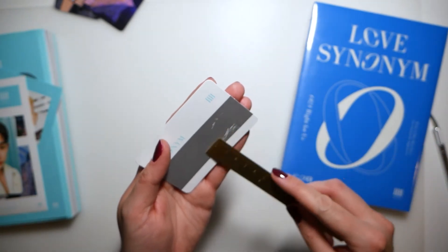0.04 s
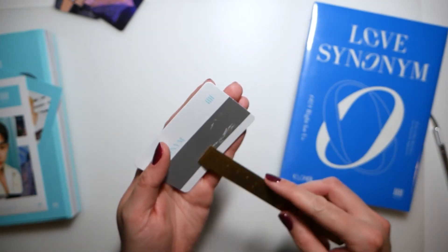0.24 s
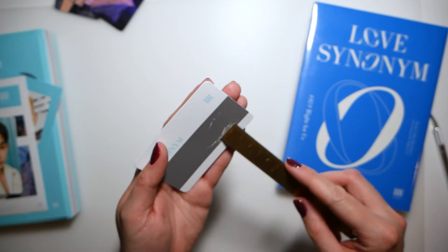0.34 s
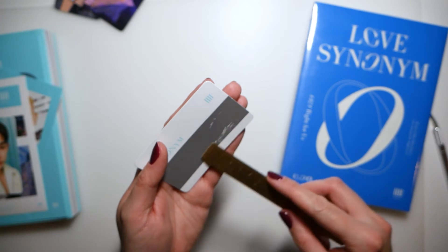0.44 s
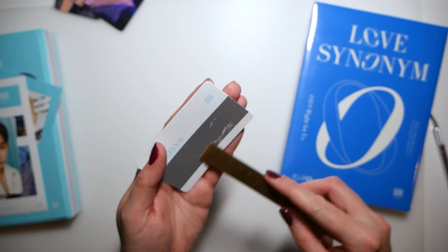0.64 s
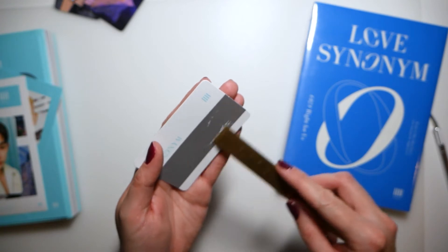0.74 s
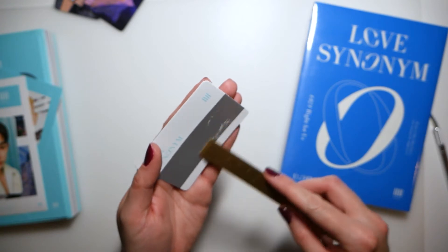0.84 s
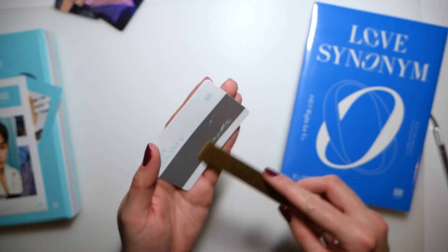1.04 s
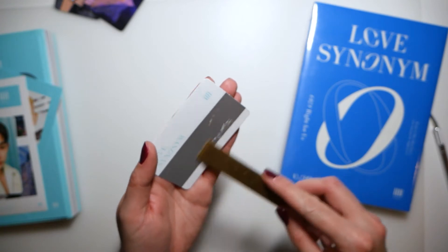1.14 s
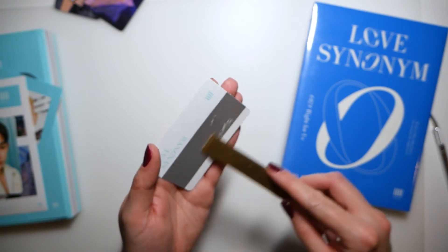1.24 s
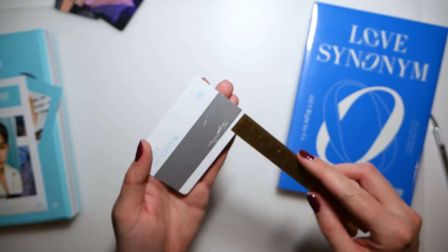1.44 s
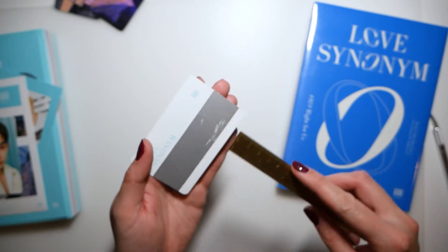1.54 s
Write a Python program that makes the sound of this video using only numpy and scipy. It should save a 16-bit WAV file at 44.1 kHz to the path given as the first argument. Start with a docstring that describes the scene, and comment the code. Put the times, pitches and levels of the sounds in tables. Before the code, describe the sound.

Quick scratching of a metal ruler on a coated card, close up in a small quiet room. Two light strokes lead into a firmer run with a thin metallic ring and tiny catches, ending on a softer stroke.

```python
"""A metal ruler's edge scrapes the coating off a hand-held card, about ten strokes a second.
Each stroke is a dense stream of tiny slips that hiss in the coating and ring the ruler and the card;
now and then the edge snags. The card is close to the microphone, dead centre, in a small dry room.
Under it lie a low room rumble and a faint electrical whine."""
import sys
import numpy as np
from scipy import signal
from scipy.fft import rfft, irfft, next_fast_len
from scipy.io import wavfile
from scipy.ndimage import map_coordinates

SR = 44100
rng = np.random.default_rng(int(sys.argv[2]) if len(sys.argv) > 2 else 0)


def to_wav(s):
    """Save 16-bit WAV."""
    ch = np.atleast_2d(s).T  # columns
    pcm = np.round(np.clip(ch, -1, 1) * 32767)  # PCM
    wavfile.write(sys.argv[1], SR, pcm.astype(np.int16))


N = 70560


def amp(db):
    """Decibels to gain."""
    return 10 ** (np.asarray(db) / 20)


def unit(x):
    """Scale to rms 1."""
    return x / np.sqrt(np.mean(x ** 2) + 1e-20)


def along(points, hz):
    """Read a curve of (freq_hz, value) points on a log frequency axis."""
    freqs, values = np.transpose(points)
    return np.interp(np.log(hz + 1), np.log(freqs + 1), values)


def filtered(x, response):
    """Pass x through a frequency response."""
    size = next_fast_len(N + SR // 2)
    return irfft(rfft(x, size) * response(np.fft.rfftfreq(size, 1 / SR)), size)[..., :N]


def colour(points):
    """A smooth response that keeps the power of white noise."""
    return lambda hz: unit(amp(along(points, hz)))


def band(hz, low_hz, high_hz, order):
    """A steep band-pass gain."""
    return 1 / np.sqrt((1 + (low_hz / (hz + 1)) ** (2 * order)) * (1 + (hz / high_hz) ** (2 * order)))


def ringing(modes, low_hz, high_hz):
    """Damped modes of alternating sign, confined to a band, keeping the power of white noise."""
    def response(hz):
        gain = sum((-1) ** k * amp(db) * 1j * hz * width / (pitch ** 2 - hz ** 2 + 1j * hz * width)
                   for k, (pitch, width, db) in enumerate(modes))
        gain *= band(hz, low_hz, high_hz, order=30)
        return gain / np.sqrt(np.mean(abs(gain) ** 2))
    return response


def stroke_levels(rise_curve=1.42, fall_curve=0.81):
    """Each stroke swells, holds and fades: one gain curve for each layer."""
    # strokes of the edge: start_s, rise_s, hold_s, fall_s, then the layers:
    # rasp_db, ring_db, upper_ring_db, fizz_db, flex_db, body_db
    strokes = [ (0.000, 0.025, 0.062, .026, -48, -44, -57, -63.5, -58.5, -65),
               (0.112, 0.024, 0.026, 0.036, -44, -42.5, -48, -57.5, -50.5, -70),
               (0.207, 0.046, 0.041, 0.024, -31, -32.5, -32, -42, -44.5, -62),
               (0.31, 0.02, 0.029, 0.047, -35.5, -36, -37.5, -44.5, -47.5, -58),
               (0.422, .056, 0.028, 0.023, -36.5, -37, -39.5, -46, -51, -62),
               (0.526, 0.028, 0.041, 0.039, -35, -36.5, -36.5, -43.5, -48, -53.5),
               (0.634, 0.0062, 0.057, .010, -45, -46, -49, -52, -56.5, -59),
               (0.695, 0.0039, 0.017, 0.019, -33, -39, -38, -49, -52, -59),
               (0.731, 0.032, 0.034, 0.044, -34, -36, -32.5, -44.5, -48, -56),
               (0.837, 0.047, 0.036, 0.043, -36, -38.5, -37, -45, -53, -56),
               (0.948, 0.019, .044, 0.028, -36, -38.5, -32.5, -43.5, -52, -54),
               (1.046, 0.048, 0.034, 0.029, -32.5, -38, -34, -44.5, -52.5, -56),
               (1.152, 0.028, 0.047, 0.043, -32.5, -37.5, -39, -44, -38, -62.5),
               (1.256, 0.019, 0.058, 0.028, -33.5, -42, -35.5, -40.5, -40, -69.5),
               (1.352, 0.02, .004, 0.036, -46.5, -42, -48.5, -52, -44, -55)]
    # swell of each layer, in that order: depth_db
    swell_db = [24.46, 26.95, 27.1, 28.3, 23.2, 20.92]
    t, power = np.arange(N) / SR, 0
    for start, rise, hold, fall, *levels_db in strokes:
        before = np.maximum((start + rise - t) / rise, 0)
        after = np.maximum((t - start - rise - hold) / fall, 0)
        slack = before ** rise_curve + after ** fall_curve
        power += amp(np.array(levels_db)[:, None] - np.outer(swell_db, slack)) ** 2
    return np.sqrt(power)


def chatter(depth_db, knots_per_s):
    """The edge grips unevenly: a smooth random gain."""
    knots = rng.standard_normal(N // 8)
    wobble = map_coordinates(knots, [np.arange(N) * knots_per_s / SR], mode="wrap")
    return unit(amp(depth_db * wobble))


def slips(per_s=12000, spread_db=2.5):
    """Tiny slips under the edge: random impulses of uneven size."""
    impulses = (rng.random(N) < per_s / SR) * np.sign(rng.standard_normal(N))
    return unit(impulses * amp(spread_db * rng.standard_normal(N)))


def patchy(x, depth_db=2.5, patch_hz=513, patch_s=0.038):
    """The colour drifts in random patches as the edge travels."""
    hz, t, spectrum = signal.stft(x, SR, nperseg=256)
    grid = np.meshgrid(hz / patch_hz, t / patch_s, indexing="ij")
    patches = map_coordinates(rng.standard_normal((100, 200)), grid, mode="wrap")
    return signal.istft(spectrum * unit(amp(depth_db * patches)), SR, nperseg=256)[1][:N]


def coating(rasp_slips, fizz_slips):
    """The coating rasps as it breaks; its finest flakes fizz above that."""
    # spectrum of the breaking coating: freq_hz, relative_db
    rasp = [(2500, -30), (3250, -1.5), (3450, -0.5), (4400, 1), (5200, 3), (5800, -0.5), (6200, -2.5),
            (6600, 5), (6950, -0.5), (7600, 5), (8700, 2), (9400, -2), (10300, -10), (11000, -21.5),
            (13400, -40)]
    # spectrum of the finest flakes: freq_hz, relative_db
    fizz = [(3000, -45.5), (9500, -14), (10400, -3.5), (11200, 5), (12000, 1.5), (12400, 3), (13400, -1),
            (15400, -7), (16000, -27)]
    return patchy(filtered(rasp_slips, colour(rasp)) + filtered(fizz_slips, colour(fizz)))


def ruler(main_force, upper_force, edge_force, high_db=-9):
    """Slips ring three groups of modes in the metal."""
    # main ring: pitch_hz, width_hz, relative_db
    main_modes = [(3461, 90, -1.5), (3494, 78, -1), (3580, 120, -2.5), (3716, 95, 0), (3754, 156, -2.5)]
    # upper ring, whose share changes with the tilt of the edge: pitch_hz, width_hz, relative_db
    upper_modes = [(3682, 190, -1.5), (3895, 180, 2), (4058, 74, 0.5), (4275, 150, 2), (4408, 210, -4),
                   (4543, 170, -3)]
    # high ring, which follows the rasp: pitch_hz, width_hz, relative_db
    high_modes = [(4975, 90, 6.5), (5700, 250, 10), (5940, 160, 14), (6510, 120, -1.5), (7000, 90, -4.5),
                  (7970, 90, 1), (7040, 150, 12.5), (7830, 140, -13), (8240, 240, 11.5), (9175, 43, 13.5),
                  (8690, 140, 2)]
    main = filtered(slips() * main_force, ringing(main_modes, low_hz=3254, high_hz=4300))
    upper = filtered(slips() * upper_force, ringing(upper_modes, low_hz=3500, high_hz=4870))
    high = filtered(slips() * edge_force, ringing(high_modes, low_hz=4600, high_hz=9500))
    return main + upper + amp(high_db) * high


def card_flex(half_width_hz=318):
    """The card vibrates in a narrow band that moves with the point of contact."""
    # bending resonance, sinking towards the rim: time_s, pitch_hz
    flex_pitch = [(0, 2723), (.54, 2750), (0.587, 2650), (0.616, 1950), (0.651, 2780), (1.129, 2860),
                  (1.17, 3664), (1.199, 3090), (1.24, 2946), (1.273, 3196), (1.308, 3050), (1.34, 2650),
                  (1.38, 2810)]
    pitch = np.interp(np.arange(N) / SR, *np.transpose(flex_pitch))
    phase = 2 * np.pi * np.cumsum(pitch) / SR
    noise = filtered(rng.standard_normal((2, N)), lambda hz: band(hz, 0, half_width_hz, order=4))
    return unit(noise[0] * np.cos(phase) + noise[1] * np.sin(phase))


def card_body(drive, level, lag_s=0.014):
    """The card gives a little after the edge bites."""
    # spectrum of the card in the hand: freq_hz, relative_db
    body = [(60, -12.5), (200, -7.5), (600, -18), (1000, -12), (1400, -14), (1540, 2), (1850, -2),
            (2200, -6), (4000, -14.5)]
    late_level = np.interp(np.arange(N) - lag_s * SR, np.arange(N), level)
    return filtered(drive * late_level, colour(body))


def scraping(upper_snag_db=-10.5):
    """Slips under an uneven grip excite coating, ruler and card."""
    rasp, ring, upper, fizz, flex, body = stroke_levels()
    snag_rasp, snag_ring, snag_flex = snag_levels()
    grip = chatter(depth_db=0.5, knots_per_s=770)
    ring_grip = chatter(depth_db=1.4, knots_per_s=385)
    edge_force = rasp * grip + snag_rasp
    main_force = ring * ring_grip + snag_ring
    upper_force = upper * ring_grip + amp(upper_snag_db) * snag_ring
    flakes = slips()
    hiss = coating(flakes * edge_force, slips() * fizz * grip)
    metal = ruler(main_force, upper_force, edge_force)
    card = card_flex() * (flex * grip + snag_flex) + card_body(flakes * grip, body)
    return hiss + metal + card


def room(x):
    """The small room answers with a short tail, shortest around 3 kHz."""
    # decay of the room: freq_hz, t60_s
    decay = [(200, 0.3), (3000, 0.15), (8000, 0.35), (15000, 0.45)]
    hz, t, spectrum = signal.stft(rng.standard_normal(SR // 3), SR, nperseg=256)
    fade = amp(-60 * t / along(decay, hz)[:, None])
    tail = signal.istft(spectrum * fade, SR, nperseg=256)[1]
    return signal.fftconvolve(x, tail / np.linalg.norm(tail))[:N]


def room_tone(rumble_db=-60, side_db=-19):
    """Room rumble and a thin electrical whine, as mid and side."""
    # spectrum of the rumble: freq_hz, relative_db
    rumble = [(25, -10.5), (70, -4), (110, -7), (220, -4), (420, -14), (900, -20), (1300, -25.5),
              (2200, -38.5), (6000, -40), (12000, -48), (15000, -45.5)]
    # steady electrical tones: pitch_hz, level_db
    tones = [(2000, -82), (3000, -92), (4000, -87), (10000, -93.5)]
    mid, side = filtered(rng.standard_normal((2, N)), colour(rumble)) * amp(rumble_db)
    whine = sum(np.sqrt(2) * amp(db) * np.sin(2 * np.pi * hz * np.arange(N) / SR) for hz, db in tones)
    return mid + whine, amp(side_db) * side


def knock(start_s=0.03, pitch_hz=615, level_db=-51.5, decay_s=0.01):
    """One soft, quickly damped bump of the card in the hand."""
    age = np.maximum(np.arange(N) / SR - start_s, 0)
    return amp(level_db) * np.sin(2 * np.pi * pitch_hz * age) * np.exp(-age / decay_s)


def snag_levels(rise_s=0.00061, decay_s=0.0017):
    """The edge catches and lets go: short bursts of force in coating, ruler and card."""
    # snags of the edge: peak_s, rasp_db, ring_db, flex_db
    snags = [(0.245, -51, -43, -38), (0.281, -26, -26, -55), (.300, -32, -24.5, -51),
             (0.323, -48, -26, -55), (0.351, -37, -28.5, -45), (0.698, -29, -28, -44),
             (.769, -33, -30.5, -57), (.915, -36.5, -28, -48.5), (.961, -35, -24, -45),
             (.980, -34.5, -28, -53), (0.989, -31.5, -23, -44), (1.28, -38, -34, -42),
             (1.379, -41.5, -31, -28)]
    t = np.arange(N) / SR
    burst = lambda age: np.exp(-np.maximum(age / decay_s, -age / rise_s))
    return sum(np.outer(amp(levels_db), burst(t - peak_s)) for peak_s, *levels_db in snags)


def scene(room_db=-22.5):
    """The scraping sits close and central; only the room's answer and rumble have width."""
    # room's answer in the side channel, against the direct sound: freq_hz, level_db
    spread = [(2500, -24), (4000, -20.5), (8000, -17.5), (13000, -19.5)]
    direct = scraping() + knock()
    mid, side = room_tone()
    mid = mid + direct + amp(room_db) * room(direct)
    side = side + filtered(room(direct), lambda hz: amp(along(spread, hz)))
    return np.array([mid + side, mid - side])


def record(dry, top_hz=15750):
    """The recorder keeps nothing above its band limit."""
    return filtered(dry, lambda hz: hz < top_hz)


dry = scene()
out = record(dry)
to_wav(out)
```